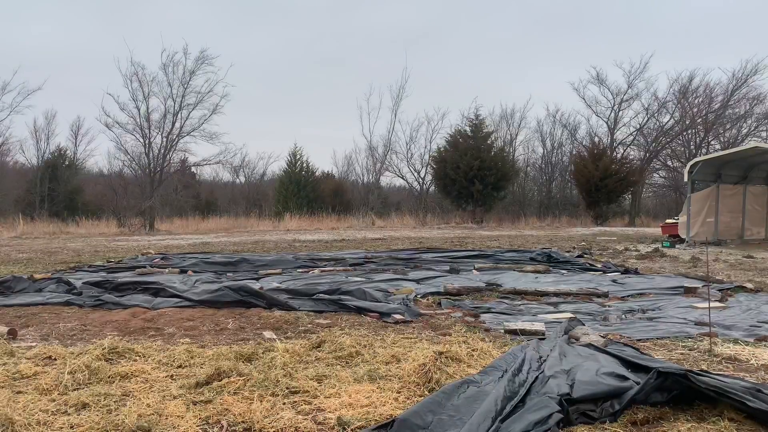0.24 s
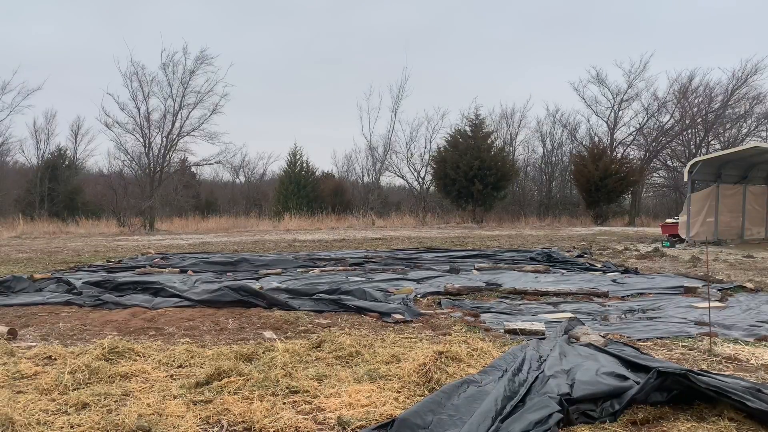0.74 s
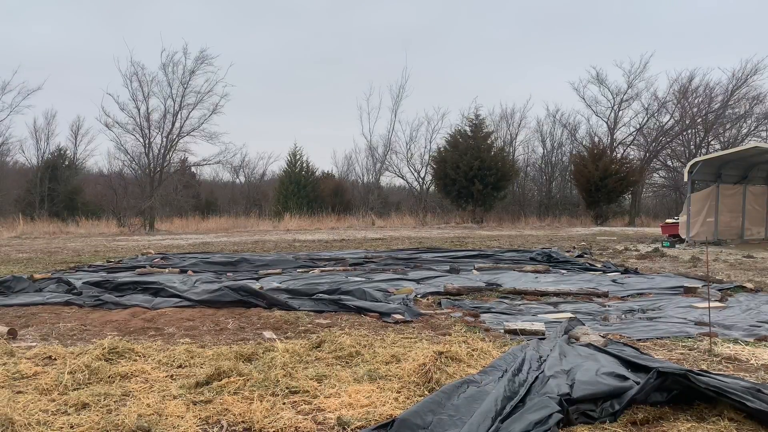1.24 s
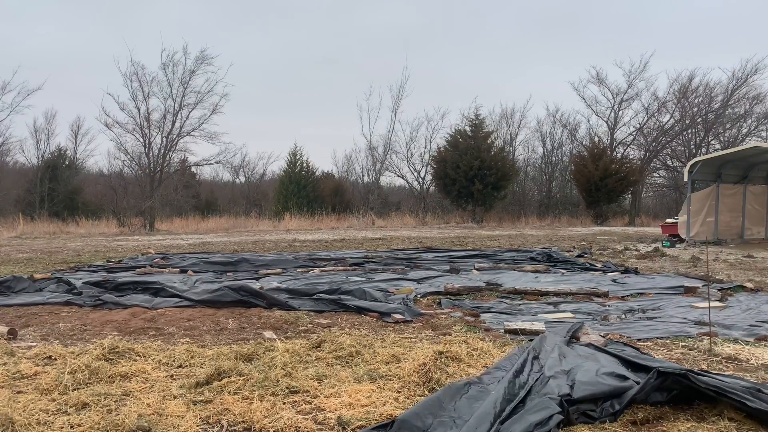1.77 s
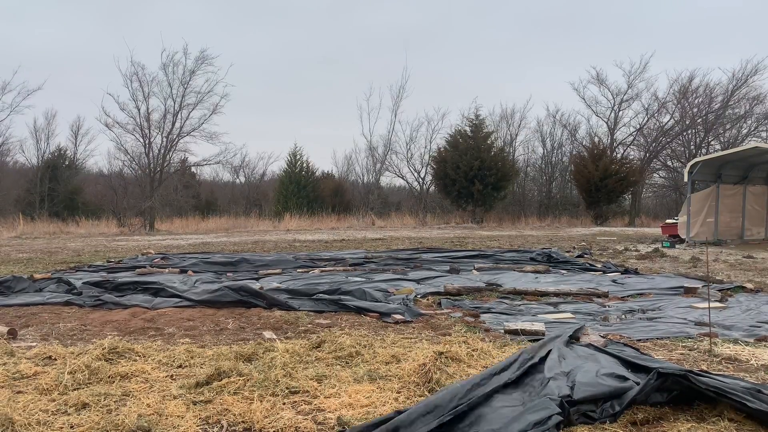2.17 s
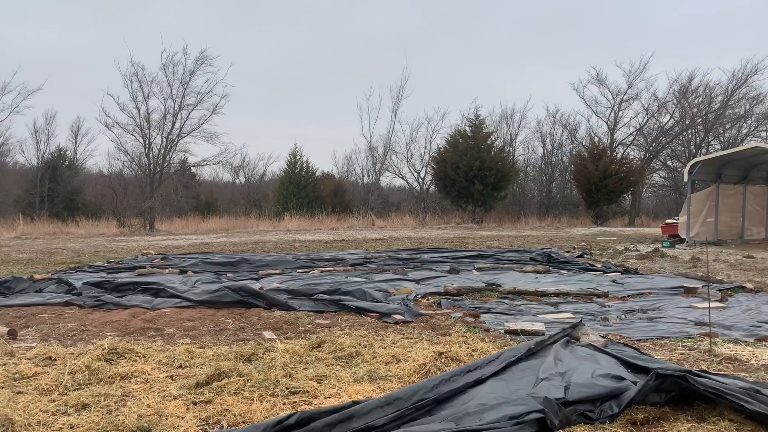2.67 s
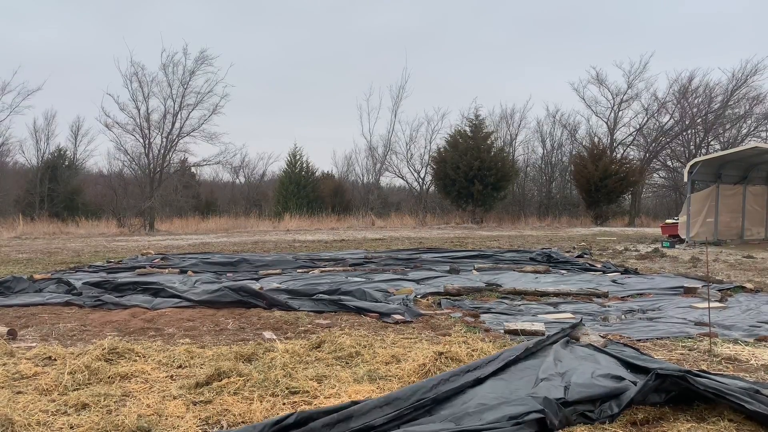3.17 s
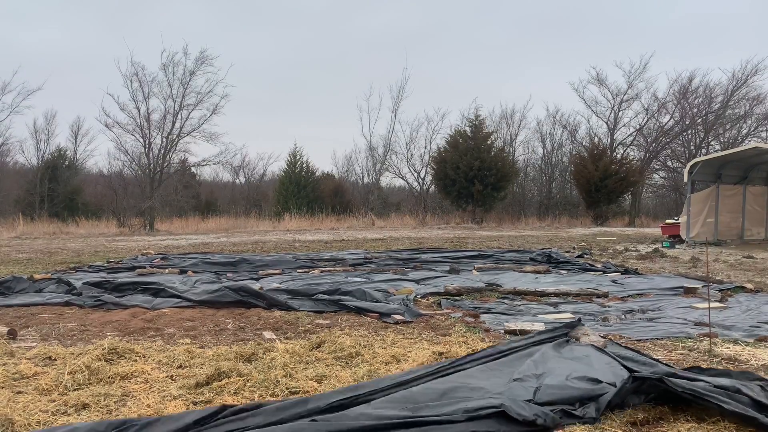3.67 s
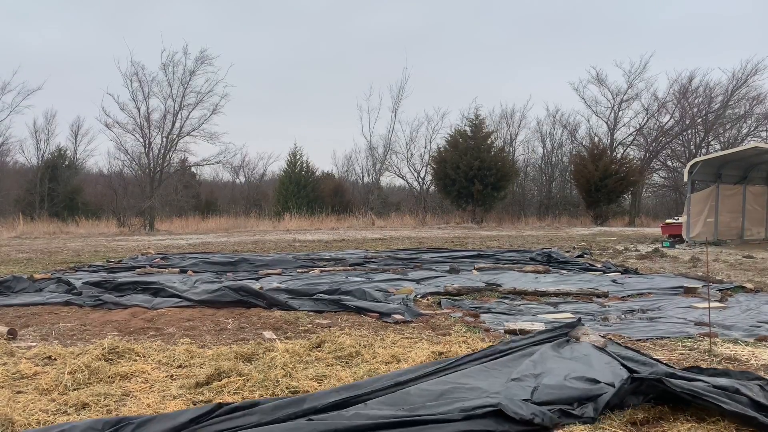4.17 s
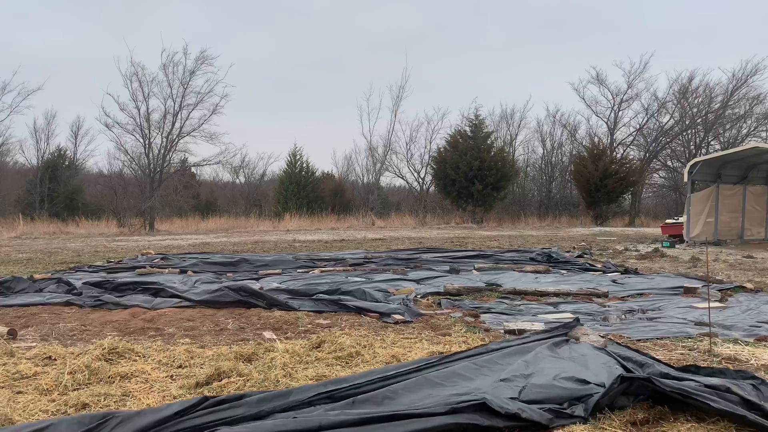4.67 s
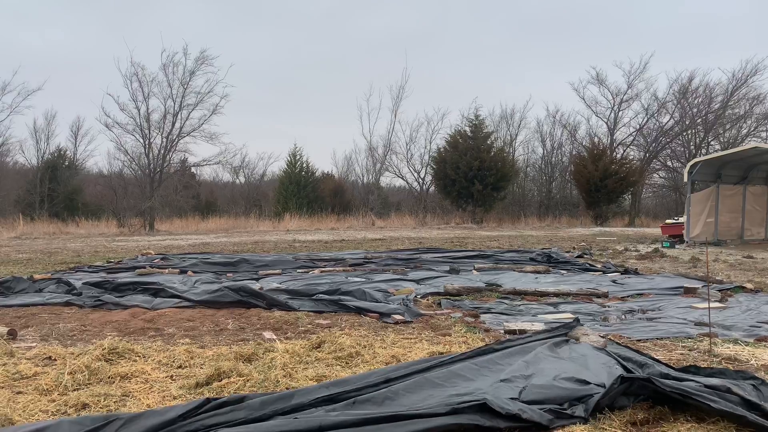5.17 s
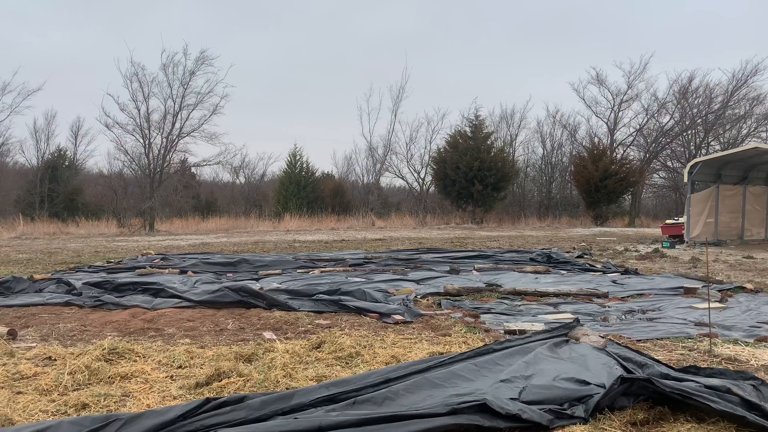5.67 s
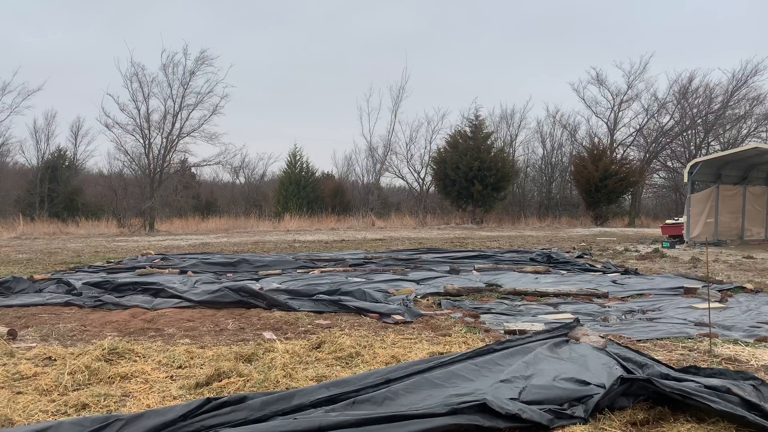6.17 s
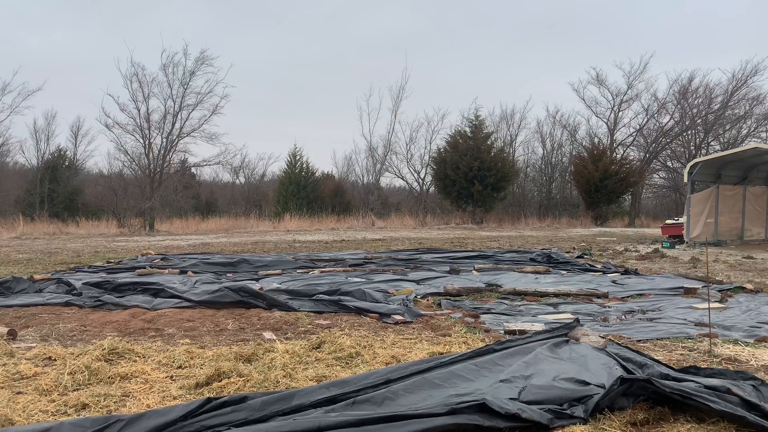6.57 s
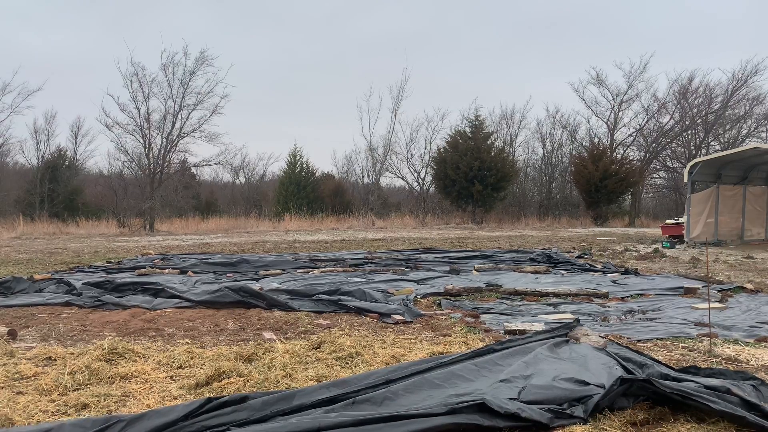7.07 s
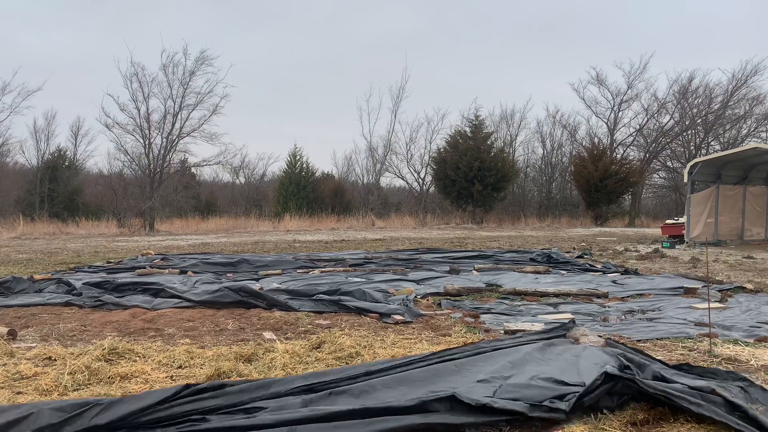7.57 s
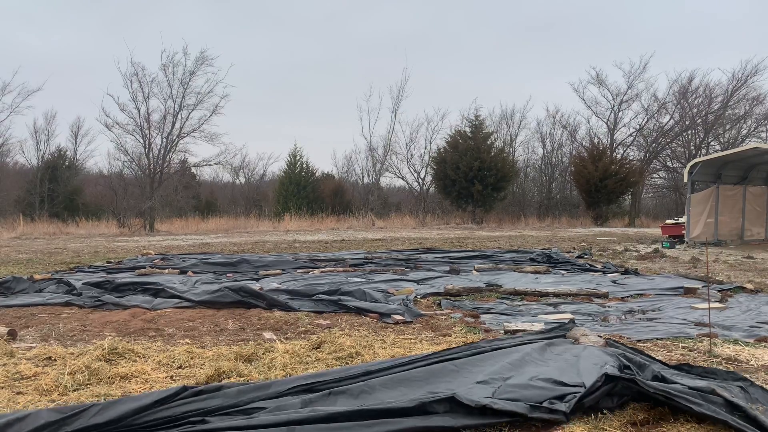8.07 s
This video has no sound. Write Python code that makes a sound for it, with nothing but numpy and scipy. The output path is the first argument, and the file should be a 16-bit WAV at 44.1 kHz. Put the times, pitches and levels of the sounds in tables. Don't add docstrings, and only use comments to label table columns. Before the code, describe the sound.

After low wind thumps, a stiff plastic tarp is dragged over dry grass, loud hissing and crackling close by, then fainter rustling further off.

```python
import sys
import numpy as np
from scipy import signal
from scipy.fft import rfft, irfft, next_fast_len
from scipy.io import wavfile
from scipy.ndimage import uniform_filter1d, map_coordinates

SR = 44100
rng = np.random.default_rng(int(sys.argv[2]) if len(sys.argv) > 2 else 0)


def field_ratio(decibels):
    return 10 ** (np.asarray(decibels, dtype=float) / 20)


def store_wav(level_fs):
    pcm = np.round(np.clip(np.atleast_2d(level_fs), -1, 1) * 32767)
    wavfile.write(sys.argv[1], SR, pcm.T.astype(np.int16))


N = 367353


def unit(x):
    return x / np.sqrt(np.mean(x ** 2) + 1e-20)


def along(points, hz):
    f, *cols = np.transpose(points)
    return np.array([np.interp(np.log(hz + 1), np.log(f + 1), c) for c in cols])


def curve(rows):
    s, values = np.transpose(rows)
    return np.interp(np.arange(N) / SR, s, values)


def wobble(rate):
    knots = rng.standard_normal(int(N * rate / SR) + 4)
    return unit(map_coordinates(knots, [np.arange(N) * rate / SR]))


def drifting(count, size):
    return unit(uniform_filter1d(rng.standard_normal(count), size=size))


def filtered(x, response):
    m = 2 * next_fast_len(N // 2 + 4096)
    return irfft(rfft(x, m) * response(np.fft.rfftfreq(m, 1 / SR)), m)[..., :N]


def mixed(rows, response):
    m = 2 * next_fast_len(N // 2 + 4096)
    return irfft((rfft(rows, m) * response(np.fft.rfftfreq(m, 1 / SR))).sum(-2), m)[..., :N]


def both(x, alike):
    turn = np.arccos(np.clip(alike, -1, 1)) / 2
    return np.cos(turn) * x[0] + np.sin(turn) * x[1] * [[1], [-1]]


# frequency in Hz, level in dB per Hz.
FIELD_TONE = [(150, -16.5), (250, 6), (1050, -4), (2400, -20), (3300, 0.5), (4000, -22), (6650, -56),
              (7900, -12), (15500, -11.5)]
# frequency in Hz, likeness from -1 to 1.
FIELD_ALIKE = [(4200, 0.345), (5200, -.7), (7800, -0.9), (8800, 0.054)]
# time in seconds, gain in dB.
BREEZE_SWELLS = [(0, 0.5), (.25, -0.5), (.29, -7), (.34, 2), (.44, 1), (.5, -6.5), (.64, -1), (.68, 0.5),
                 (.785, 2.5), (.81, -8.5), (.96, -5), (1.1, -1.5)]


def field():
    def response(hz):
        turn = np.arccos(np.clip(along(FIELD_ALIKE, hz)[0], -1, 1)) / 2
        left, right = [np.cos(turn), np.sin(turn)], [np.cos(turn), -np.sin(turn)]
        return field_ratio(along(FIELD_TONE, hz)[0]) * np.array([left, right])
    level_db = -64.0 + curve(BREEZE_SWELLS) + 0.59 * wobble(9.3)
    return field_ratio(level_db) * unit(mixed(rng.standard_normal((2, N)), response))


# time in seconds, level in dB.
WIND_DRIFT = [(0, -51.5), (.16, -54.5), (.21, -39.5), (.42, -49), (.67, -60.5), (1.2, -54.5), (1.64, -49.5),
              (1.69, -69.5), (1.88, -56.5), (2.37, -55.5), (3.16, -59), (4.3, -54.5), (4.95, -53.5),
              (5.45, -59), (6.5, -58.5), (7.2, -56.5), (7.6, -54.5), (8.33, -60)]
# middle in seconds, gain in dB, width in seconds.
GUSTS_AND_LULLS = [(0, 9.5, 0.013), (0.254, -37.5, 0.00507), (.29, -3, 0.0116), (.388, -24.5, 0.0047),
                   (0.461, 17, 0.0155), (.56, 4.5, 0.035), (2.48, -14.5, 0.011), (3.22, 10.5, 0.0265),
                   (3.311, 21, 0.0284), (3.429, -7.5, 0.027), (4.34, -21.5, 0.0145), (4.42, 7, 0.11),
                   (4.59, -5, 0.033), (5.03, -16, 0.0233), (6.36, 4, 0.011), (6.73, 2, 0.023),
                   (6.82, -5, 0.014), (7.28, 7.5, 0.0205), (7.38, 11, 0.0185), (7.46, -2.5, 0.046),
                   (7.66, -9, 0.0122)]


def gusts():
    t = np.arange(N) / SR
    level_db = curve(WIND_DRIFT)
    for s, gain_db, width in GUSTS_AND_LULLS:
        level_db = level_db + gain_db * np.exp(-.5 * ((t - s) / width) ** 2)
    return level_db


# frequency in Hz, level in dB per Hz.
WIND_TONE = [(15, -70), (25, -16), (43, -16), (56, -6), (113, -1), (190, -9), (316, -31), (378, -22),
             (420, -36.5), (550, -68), (920, -120)]
# middle in seconds, peak in dB, length in seconds.
WIND_POPS = [(0.01, -38.5, 0.0039), (0.194, -44, 0.0047), (0.205, -29, 0.0062), (0.213, -24.5, 0.0031),
             (0.237, -28, 0.0051), (0.29, -46, 0.0135), (0.358, -36, 0.0054), (0.409, -39.5, 0.0059),
             (0.456, -23, 0.0085), (0.46, -18, 0.00268), (0.464, -19.5, 0.00266), (0.485, -32.5, 0.0174),
             (0.605, -38, 0.0041), (1.603, -32.5, 0.038), (3.2, -54, 0.0044), (3.294, -41.5, 0.0093),
             (3.302, -28, 0.0068), (3.326, -31.5, 0.0097), (4.377, -40.5, 0.0035), (7.347, -29.5, 0.0084),
             (0.28, -48.5, 0.0054), (7.39, -28, 0.0092)]


def wind():
    lumps = field_ratio(1.8 * wobble(18)) * both(rng.standard_normal((2, N)), alike=.7)
    air = field_ratio(gusts() + 5.5) * unit(filtered(lumps, lambda hz: field_ratio(along(WIND_TONE, hz)[0])))
    t = np.arange(-2048, 2048) / SR
    hz = np.fft.rfftfreq(len(t), 1 / SR)
    no_rumble = (hz / 90) ** 2 / (1 + (hz / 90) ** 2)
    for s, db, length in WIND_POPS:
        edge_hz = 260 * 2 ** (0.03 * (db + 23.0))
        slope = no_rumble / (3.0 + (hz / edge_hz) ** 3.675)
        noise = both(rng.standard_normal((2, len(t))), alike=0.6)
        pop = irfft(rfft(noise) * slope) * np.exp(-.5 * (t / length) ** 2)
        pop = field_ratio(db - 7.5) * pop / abs(pop).max()
        at = round(s * SR) + np.arange(len(t)) - len(t) // 2
        air[:, at[at >= 0]] += pop[:, at >= 0]
    return air


# time in seconds, level in dB.
DRAG_SPEED = [(0, -77), (.95, -77.5), (1.035, -35.5), (1.45, -38.5), (2.0, -36), (2.32, -37.5),
              (2.7, -55.5), (3.13, -54), (3.7, -50.5), (4.0, -50), (4.35, -46), (4.8, -46.5), (5.15, -53),
              (6.2, -50), (7.03, -59), (7.39, -40.5), (7.65, -49.5), (8.33, -52)]
# start in seconds, hold in seconds, gain in dB, extra crinkle in dB.
TUGS_AND_SLACKS = [(0.28, 0.16, 3.5, -1), (0.647, 0.071, 7, 1.5), (1.071, 0.0886, 3.5, 1),
                   (1.198, 0.0782, 5, 4), (1.573, 0.0167, -2.5, 1), (1.601, 0.052, 2.5, 0),
                   (1.913, 0.042, 1.5, 1.5), (2.279, 0.112, -2.5, -3.5), (2.585, 0.0452, 6.5, 3.5),
                   (2.816, 0.037, 2, 1.5), (3.152, 0.0272, 5.5, 8), (3.181, 0.3067, 14, 0),
                   (3.382, 0.112, -0.65, -5), (3.824, 0.069, 1, -5), (3.917, 0.047, -4, -6),
                   (4.858, 0.021, 0.5, 1.5), (5.184, 0.0204, 6.5, 4), (5.269, 0.0917, 8, 1.52),
                   (5.42, 0.016, 3.5, -1.5), (5.483, 0.0336, 3, 1.5), (5.466, 0.309, 10, 0),
                   (5.89, 0.1466, 4.5, 2.5), (6.236, 0.0547, 6.5, 4.5), (6.324, 0.08, 10, 2.5),
                   (6.445, 0.1544, 7, 0), (6.803, 0.0295, 4, -0.5), (7.11, 0.114, 1.5, 1),
                   (7.456, 0.13, -1.5, -5), (8.017, 0.146, -1.84, -5.5), (8.255, 0.065, 2, 0),
                   (0.019, 0.0384, 7, -2), (0.361, 0.052, -1, 9), (1.024, 0.01334, 5, 4.5),
                   (1.307, 0.187, 1, 2), (2.224, 0.047, -1.5, -3.5), (2.676, 0.022, -1.5, -3.5),
                   (4.226, 0.054, 2, 0), (6.685, 0.02, 7, 0.5), (6.753, 0.0254, -4.5, 0),
                   (6.849, 0.0177, -3.5, -7.5), (6.945, 0.0593, -3.5, -8), (7.018, 0.025, 1.5, -1.5),
                   (7.103, 0.023, 4.5, 0.5), (7.265, 0.024, 1.5, 1.5), (7.39, 0.029, 0.5, -0.5),
                   (7.48, 0.044, 4, -1), (1.79, 0.085, 0.5, 1.5), (2.051, 0.0596, -2.5, -2.5),
                   (5.648, 0.071, -0.5, 1), (7.32, 0.0287, 2, -0.5)]


def pull():
    t = np.arange(N) / SR
    scrape_db, extra_db = curve(DRAG_SPEED), np.zeros(N)
    for s, hold, gain_db, crinkle_db in TUGS_AND_SLACKS:
        take_up = 0.017 + 0.119 * hold
        let_go = 0.0121 + 0.427 * hold
        shape = np.interp(t, np.cumsum([s, take_up, hold, let_go]), [0, 1, 1, 0])
        scrape_db = scrape_db + gain_db * shape
        extra_db = extra_db + crinkle_db * shape
    faster_db = scrape_db + 45
    belly_db = -4 - 0.235 * faster_db
    crinkle_db = -8.5 - 0.139 * faster_db + extra_db
    return scrape_db, belly_db, crinkle_db


def creases(per_s, spread_db, hiss_db):
    folds = (rng.random(N) < 90 / SR) * np.minimum(rng.exponential(size=N), 1.6)
    clumps = signal.lfilter([1], [1, -field_ratio(-60 / SR / .08)], folds)
    chance = per_s / SR * (0.41 + .55 * clumps)
    size = (rng.random(N) < chance) * field_ratio(spread_db * np.minimum(rng.exponential(size=N), 2.6))
    size = signal.lfilter([1], [1, -.8], size)
    ticks = unit(size * rng.standard_normal((2, N)))
    return unit(ticks + field_ratio(hiss_db) * rng.standard_normal((2, N)))


# time in seconds, peak in dB, dull part and fine part in dB above that peak.
LARGE_CREASES = [(0.0184, -47.5, 6.5, -34), (0.111, -49, -12, -25.5), (0.6943, -38.5, 0, -30),
                 (0.7038, -38, 7, -28), (0.774, -51, 11, -10), (0.968, -36, -10, -19.5),
                 (1.0015, -26.5, -26.5, -19), (1.0312, -22, -22.5, -9.5), (1.045, -18, -14, -7),
                 (1.087, -17, -21, -13), (1.547, -24, -3.5, -8), (1.6264, -18, -5.5, -26),
                 (1.7524, -16.5, -34.5, -21.5), (1.9334, -18, -22, -21), (2.2542, -20.5, -18, -28),
                 (2.5108, -30, 5.5, -8.5), (2.5492, -28, 4.5, -8), (2.8827, -34.5, -4, -11.5),
                 (3.52, -26, -2, -35.5), (3.907, -28, 0.5, -27), (4.043, -32.5, -16.5, -8.5),
                 (4.2716, -33, 6, -5.5), (5.4984, -27, -4.5, -14), (5.5101, -21, -27.5, -28),
                 (6.8472, -30, -26.5, -33), (6.8837, -34.5, -20, -20.5), (7.112, -39.5, -24, -2.5),
                 (7.5002, -36, -14.5, -27), (7.926, -29, 1.5, -16.5), (8.0101, -46.5, -7, -0.5),
                 (.3102, -60.5, -12, 0.5), (.3596, -64.5, -10, 2), (.378, -70.5, -8.5, 3.5),
                 (0.394, -62.5, -10, 4.5), (1.096, -19.5, -4.5, -18.5), (1.1243, -33, -15, -21),
                 (1.25, -29.5, -6.5, -7), (1.466, -21.5, -2, -25), (1.8791, -18.5, -6.5, -18),
                 (1.9639, -18, -19.5, -21.5), (2.3091, -24.5, -18, -22), (2.644, -32.5, -5.5, -20.5),
                 (2.8162, -45, -15.5, 5.5), (3.8231, -47, -18, 3), (5.4238, -45.5, -10, 3),
                 (6.0566, -44, -20, 6.5), (6.7523, -34, -17.5, -22.5), (7.1219, -35.5, -15, -18),
                 (7.477, -49.5, -15, 4.5), (8.0585, -50, -15, 2.5), (7.9812, -31.5, -15.5, -19.5),
                 (1.186, -27, -11.5, -11.5), (1.279, -25, -2, -14), (6.7205, -34.5, -13.5, -19.5),
                 (8.0945, -36, 4, -17)]
# time in seconds, peak in dB.
THIN_CREASES = [(1.2197, -28), (2.606, -37), (2.79, -38.5), (2.9632, -41), (3.0113, -43), (3.1051, -34),
                (3.186, -49), (3.2605, -32.5), (4.9783, -48.5), (6.2137, -37), (3.7019, -33.5),
                (3.8776, -34), (4.3738, -30.5), (4.793, -32.5), (4.891, -40.5), (5.2068, -43.5),
                (5.615, -43.5), (6.266, -37), (6.7962, -44), (6.801, -48), (6.8995, -41), (7.0154, -42.5),
                (7.056, -40.5), (7.0771, -41.5), (7.2815, -37.5), (8.2454, -42.5), (2.1592, -41.5),
                (2.3278, -39), (2.586, -34.5), (2.729, -42.5), (3.0045, -48.5), (1.0218, -27.5),
                (2.4251, -36), (2.6566, -43), (1.9106, -47), (3.8658, -41), (7.2556, -35.5),
                (4.2066, -49.5), (4.3173, -46), (4.4515, -47), (4.4993, -33.5), (5.0808, -39),
                (5.1468, -40), (6.015, -50.5), (6.1508, -42.5), (6.54, -49), (6.6217, -40.5), (6.6655, -48),
                (6.69, -39), (6.83, -44.5), (6.9554, -47), (7.2166, -35.5), (7.704, -37)]


def snaps():
    t = np.arange(1024) / SR
    parts = np.zeros((3, 2, N + len(t)))
    noise = rng.standard_normal((2, N + len(t)))
    fade = field_ratio(2.0 - 60 * t / 0.00803) + field_ratio(-11.0 - 60 * t / 0.0493)
    envelope = fade * (1 - np.exp(-t / 0.0005))
    thin = [(s, db, -36.5, -7.5) for s, db in THIN_CREASES]
    for s, db, dull_db, fine_db in [*LARGE_CREASES, *thin]:
        at = slice(round(s * SR), round(s * SR) + len(t))
        levels_db = [[[db + dull_db + 16.5]], [[db + 11.5]], [[db + fine_db + 30.0]]]
        parts[..., at] += field_ratio(levels_db) * noise[:, at] * envelope
    return parts[..., :N]


def causal(gain):
    cep = irfft(np.log(gain + 1e-6))
    half = cep.shape[-1] // 2
    cep[..., 1:half] *= 2
    cep[..., half + 1:] = 0
    return np.exp(rfft(cep))


def ports(pair, colour, shared):
    f, like, lead = np.transpose(shared)

    def response(hz):
        same = np.interp(hz, f, np.clip(like, 0, .99))
        late = same * np.exp(-1j * np.interp(hz, f, lead))
        left_db, right_db = along(colour, hz)
        ring = causal(field_ratio(left_db))
        right = ring * field_ratio(right_db - left_db)
        return np.array([[ring, 0 * ring], [right * late, right * np.sqrt(1 - same ** 2)]])
    return mixed(pair, response)


# time in seconds, centre in Hz, depth in dB.
FOLD_SHADOW = [(0.999, 6300, -11), (1.06, 6160, -5), (1.14, 5250, -11.5), (1.2, 5330, -2),
               (1.259, 5130, -12.5), (1.37, 4443, -7), (1.43, 4950, -3), (1.5, 5297, -15), (1.58, 5412, -4),
               (1.66, 5620, -7.5), (1.82, 5316, -0.5), (1.93, 5980, -8), (2.07, 6190, -5), (2.15, 5700, -4),
               (2.24, 6340, -15), (2.35, 5670, -10.5)]


def grounded(x):
    hz, t, z = signal.stft(x[0] + x[1], SR, nperseg=512)
    s, centre_hz, depth_db = np.transpose(FOLD_SHADOW)
    centre = np.interp(t, s, centre_hz) + 202 * drifting(len(t), size=4)

    def dip(at_hz):
        return np.exp(-.5 * ((hz[:, None] - at_hz) / 340) ** 2)
    dips = dip(centre) + 0.34 * dip(1.74 * centre)
    notch_db = np.interp(t, s, depth_db, left=0) * dips
    return x + signal.istft(z * (field_ratio(notch_db) - 1), SR, nperseg=512)[1][:N] / 2


# frequency in Hz, left level in dB, right level in dB.
NEAR_TONE = [(255, -11.5, -10.5), (633, -13, -9), (847, -9.5, -16.5), (1198, -9.5, -13.5),
             (1398, -15.5, -18.5), (2103, -7, -13), (2849, -7, -15.5), (3357, -0.5, -12.5),
             (3992, -9.5, -11.5), (5756, -19.5, -19), (7357, -20, -21.5), (10120, -27.5, -23),
             (13750, -31, -30), (15200, -33.5, -23.5)]
# frequency in Hz, left level in dB, right level in dB.
FAR_TONE = [(243, -11, -7.5), (606.7, -15.5, -11), (658, -19.5, -24), (908, -6.5, -11.5),
            (1430, -13.5, -13), (1940.3, -4, -5.5), (2516, -4, -4), (3366, 3, -5), (3827.6, -8, -9.5),
            (5050, -16, -13.5), (7004, -17.5, -19), (9447, -22, -20), (13820, -36.5, -30.5),
            (14110, -31.5, -83.5)]
# frequency in Hz, likeness from 0 to 1, left lead in radians.
NEAR_SHARED = [(200, 0.87, 0.098), (484.5, 0.84, 0.466), (725.4, 0.92, 2.713), (827.5, 0.95, 1.302),
               (2372, 0.7, 2.2), (3080, 0.58, 2.01), (3280, 0.2, 0.67), (4740, 0, 1.7), (5630, 0.2, 1.5),
               (6240, 0, 2.1), (9875, 0.2, 5.3), (13330, 0.6, 13.5), (16300, 0.3, 14.9)]
# frequency in Hz, likeness from 0 to 1, left lead in radians.
FAR_SHARED = [(279, 0.925, 0.27), (721.4, 0.942, 2.67), (831, 0.39, 2.905), (1454, 0.85, 2.934),
              (2239, 0.925, 3.15), (2989, 0.912, 4.04), (3550, 0.69, 3.91), (4077, 0.6366, 2.817),
              (5592, 0.78, 1.994), (6241, 0.68, 2.367), (7285, 0.659, 3.25), (10173, 0.81, 6.925),
              (12825, 0.54, 13.3), (15000, 0.6, 10)]
# time in seconds, share of the far path from 0 to 1.
MOVING_AWAY = [
    (2.1, 0.),
    (2.6, 0.924),
    (3.15, 0.882),
    (3.3, 0.478),
    (3.6, 0.296),
    (3.75, 0.702),
    (6.7, 0.84),
    (7.4, 0.719),
    (8.33, 0.623),
]


def tarp():
    scrape_db, belly_db, crinkle_db = pull()
    jerks = 1.3 * wobble(14) + 0.683 * wobble(45)
    dull, bright, sharp = snaps()
    sheet = creases(per_s=2600, spread_db=3.5, hiss_db=1.5)
    fine = creases(per_s=1100, spread_db=3.0, hiss_db=3.5)
    belly = field_ratio(scrape_db + belly_db + 26.5 + 1.084 * jerks) * sheet + dull
    crinkle_level_db = scrape_db + crinkle_db + 30.5 + 1.03 * jerks + 0.665 * wobble(25)
    crinkle = field_ratio(crinkle_level_db) * fine + sharp
    scrape = field_ratio(scrape_db + 19.5 + 0.166 * jerks) * sheet + bright

    def ranges(hz):
        def below(edge_hz):
            return 1 / (1 + (hz / edge_hz) ** 6)
        low, middle, high = below(1674) - below(103), below(5670) - below(1468), 1 - below(5292)
        return np.array([low, middle, high])
    whole = mixed(np.stack([belly, scrape, crinkle], axis=1), ranges)
    away = np.clip(curve(MOVING_AWAY), 0, 1)
    near = grounded(ports(whole * (1 - away), NEAR_TONE, NEAR_SHARED))
    return near + ports(whole * away, FAR_TONE, FAR_SHARED)


def scene():
    return field() + wind() + tarp()


def bands(power, share, widest):
    line = np.arange(power.shape[-2])
    band = np.cumsum(1 / np.clip(line * share, 4, widest)).astype(int)
    start = np.flatnonzero(np.diff(band, prepend=-1))
    sums = np.add.reduceat(power, start, axis=-2) / np.bincount(band)[band[start], None]
    return np.repeat(sums, np.diff(start, append=len(line)), axis=-2)


# frequency in Hz, level in dB about its neighbours.
MASK_TONE = [(1300, -13.5), (2500, -15.5), (3800, -11), (4350, -6), (5300, -10.5), (6300, -6.5),
             (7200, -5.5), (8300, -8), (10000, -8.5), (13000, -8), (14000, -7.5), (15500, -9.5)]
# time in seconds, dB added to the mask.
MASK_RISE = [(0, 4.5), (.25, 3.5), (.32, 2), (.45, 2.5), (.5, 3.5), (.64, 3), (.72, -5), (.98, -4),
             (1.04, 3.5), (2.3, 2.5), (2.41, 3.5), (3.24, 3.5), (3.3, 2.5), (3.68, 1.5), (3.74, 2.5),
             (4.4, 3), (4.47, 3.5), (6.74, 3), (6.78, 3.5), (7.1, 3.5), (7.14, 5), (7.3, 2.5), (7.34, 1),
             (7.54, 0.5), (7.58, 1), (7.82, 4.5), (7.86, 2.5), (8.33, 2)]
# time in seconds, dB taken off the mask.
SPARED_MOMENTS = [(2.65, 7), (2.785, 7.5), (3.005, 9.5), (3.255, 4), (3.68, 5.5), (3.831, 7.5), (3.9, 3),
                  (3.99, 7), (4.185, 6), (4.25, 5.5), (4.345, 6), (4.445, 7), (4.731, 7.5), (4.799, 2.5),
                  (4.885, 0), (4.975, 4), (5.04, 0), (5.205, 8), (5.44, 2.5), (5.492, 5), (5.68, 6),
                  (5.81, 1.5), (6.205, 7.5), (6.485, 5.5), (6.8, 5.5), (6.89, 7.5), (7.01, 6.5),
                  (7.105, 5.5), (7.97, 4), (8.2, 4)]


def hide_masked(x):
    lead = 1024 - 214
    pair = np.pad([x[0] + x[1], x[0] - x[1]], ((0, 0), (lead, 0)))
    hz, t, z = signal.stft(pair, SR, window="cosine", nperseg=2048)
    t = t - lead / SR
    power = abs(z) ** 2
    masker = np.sqrt(abs(uniform_filter1d(power.max(axis=0), 48, axis=0)))
    spared_db = sum(db * np.exp(-((t - s) / .014) ** 4) for s, db in SPARED_MOMENTS)
    rise_db = np.interp(t, *np.transpose(MASK_RISE)) + 0.5 * drifting(len(t), size=2) - spared_db
    mask = field_ratio(along(MASK_TONE, hz).T) * masker
    banded = bands(uniform_filter1d(power / mask ** 2, size=3), share=.09, widest=20)
    near_top_hz, far_top_hz = 14590, 14160
    top_hz = near_top_hz + (far_top_hz - near_top_hz) * np.interp(t, *np.transpose(MOVING_AWAY))
    top_hz = top_hz + 800 * (t < 0.96)
    top_hz = top_hz + 550 * np.clip(spared_db - 4, 0, None)
    top_hz = top_hz + 436.5 * drifting(len(t), size=2)
    top_hz = 345 * np.round(top_hz / 345)
    heard = (banded > field_ratio(2 * rise_db)) | (hz < MASK_TONE[0][0])[:, None]
    keep = heard & (hz[:, None] < top_hz)
    mid, side = signal.istft(z * keep, SR, window="cosine", nperseg=2048)[1][:, lead:lead + N]
    return np.array([mid + side, mid - side]) / 2


def band_limit(x):
    return signal.sosfilt(signal.butter(12, 15760, fs=SR, output="sos"), x)


def record(dry):
    x = filtered(dry, lambda hz: (1j * hz / 58) ** 3 / (1 + 1j * hz / 58) ** 3)
    x = x / (1 + abs(x / .3) ** 3) ** (1 / 3)
    return band_limit(hide_masked(x))


dry = scene()
out = record(dry)
store_wav(out)
```